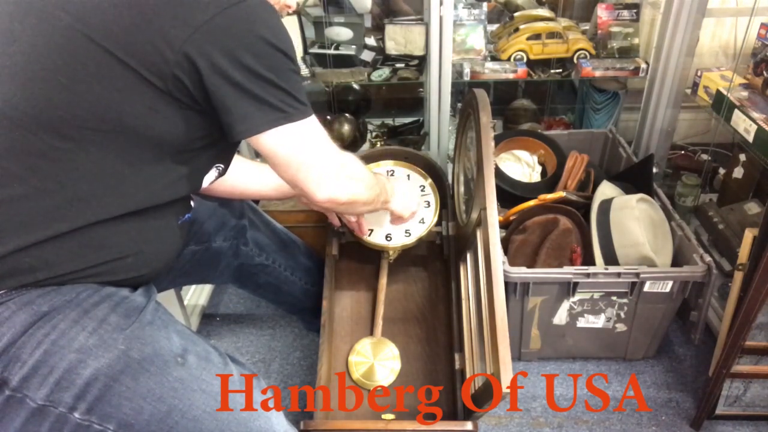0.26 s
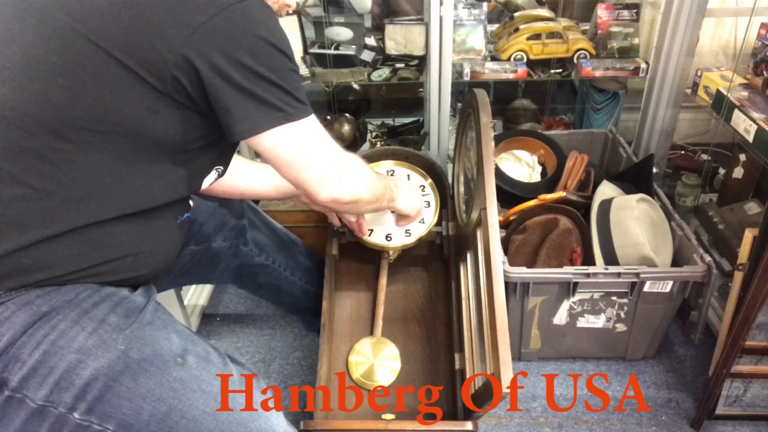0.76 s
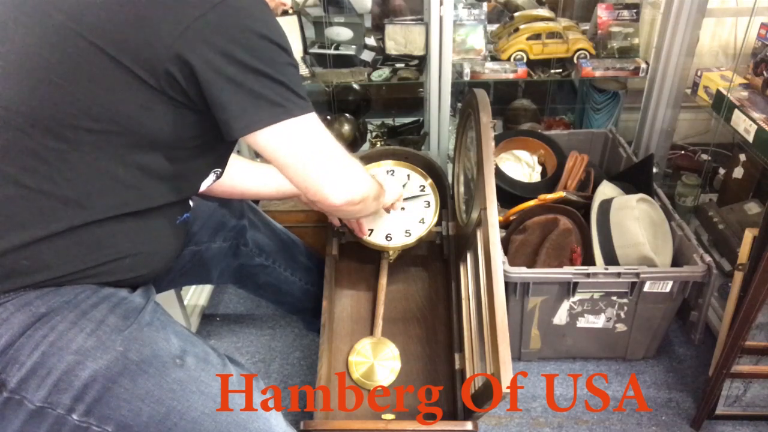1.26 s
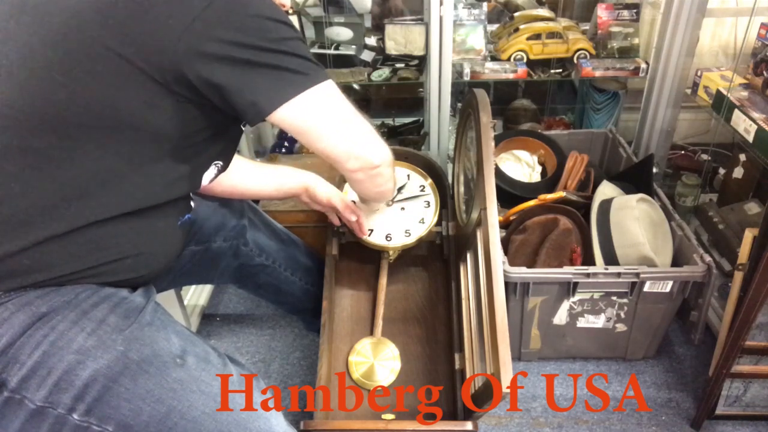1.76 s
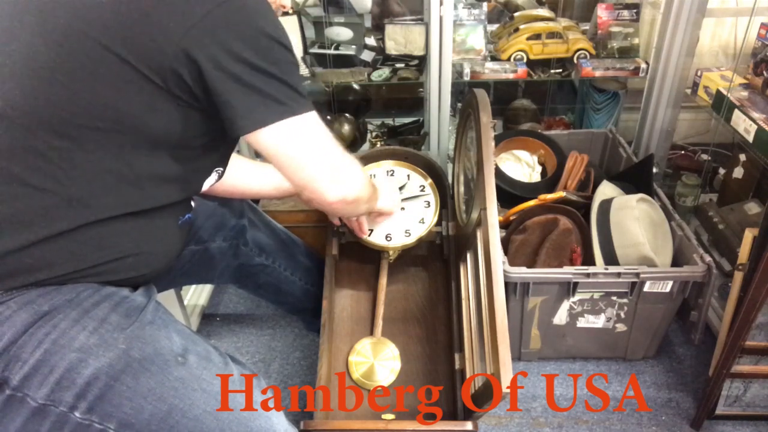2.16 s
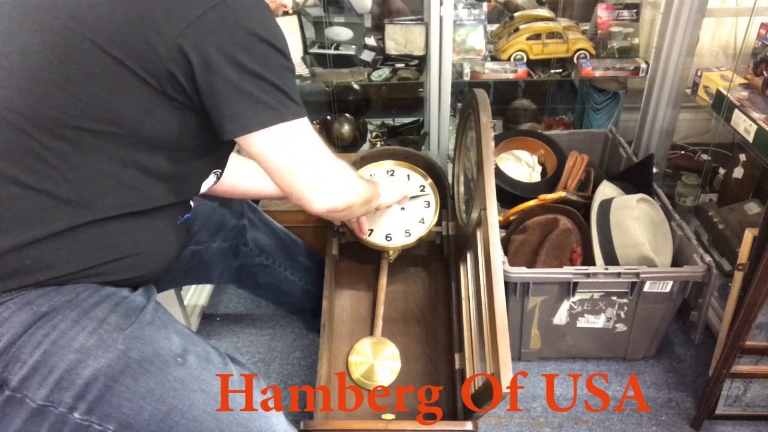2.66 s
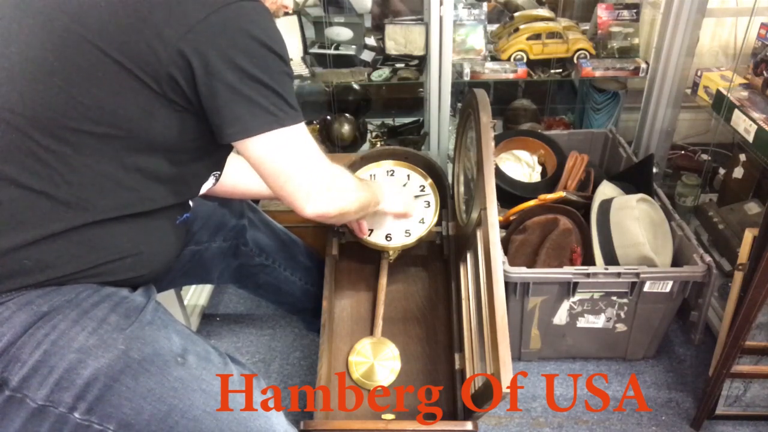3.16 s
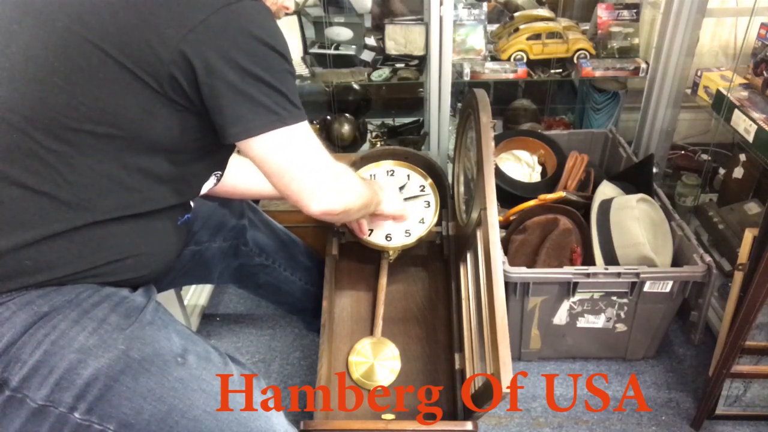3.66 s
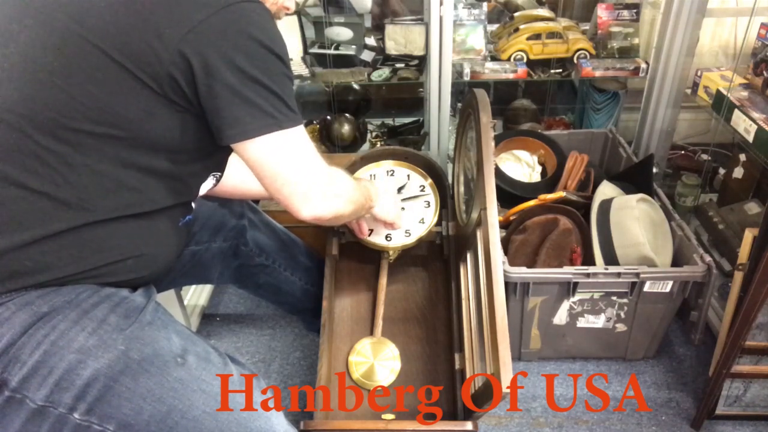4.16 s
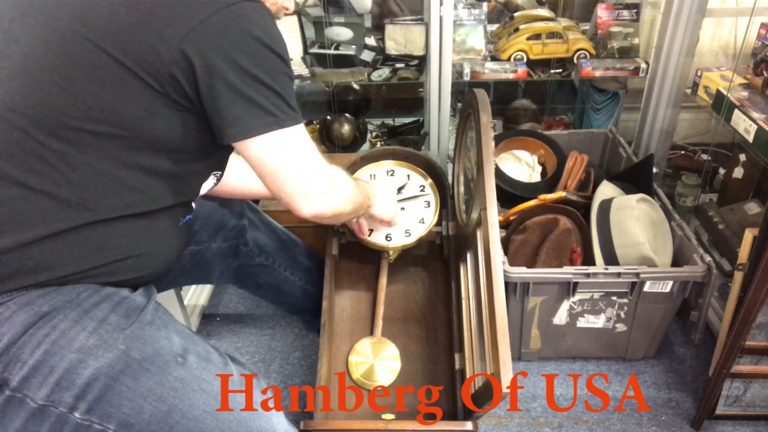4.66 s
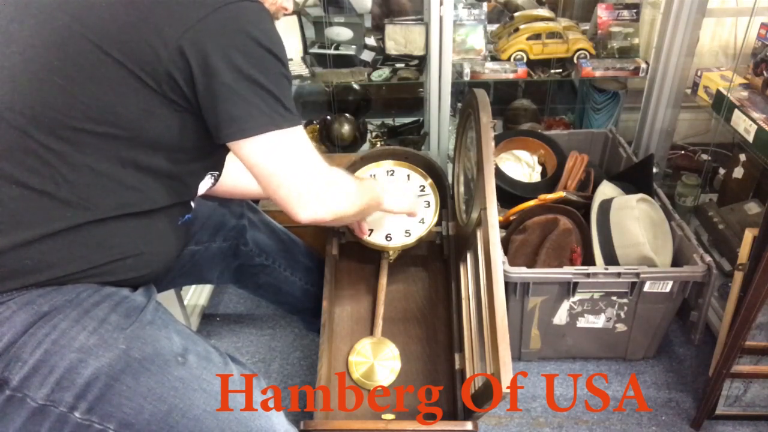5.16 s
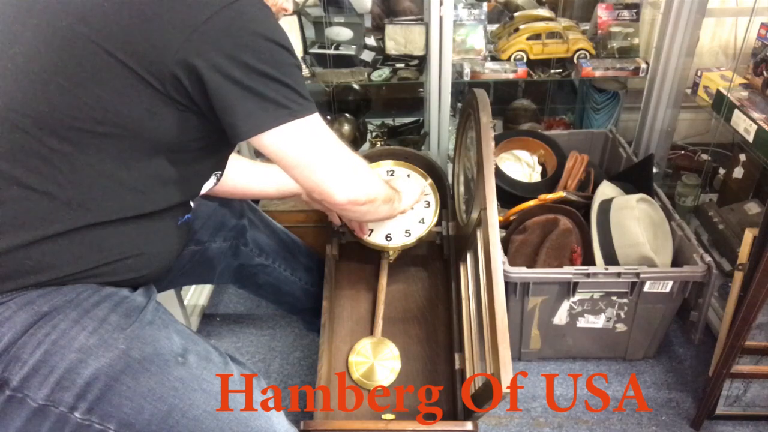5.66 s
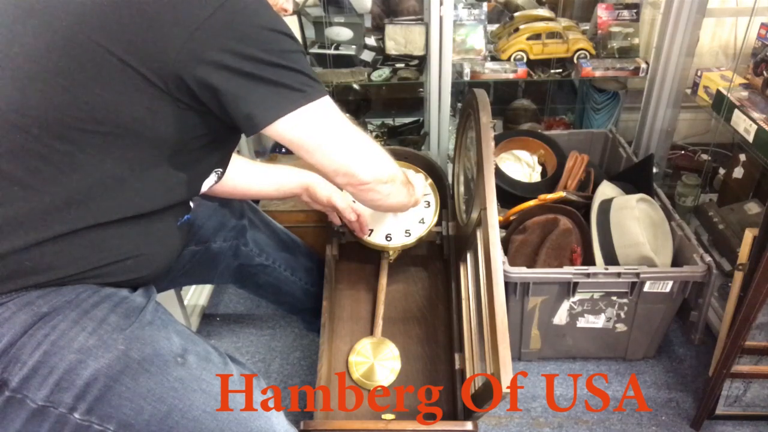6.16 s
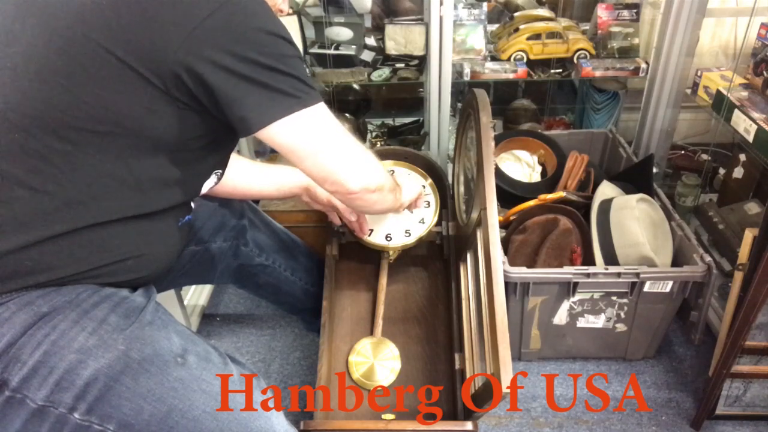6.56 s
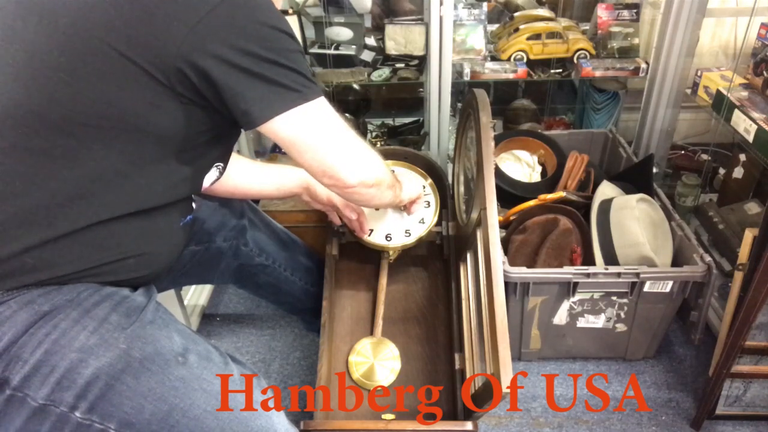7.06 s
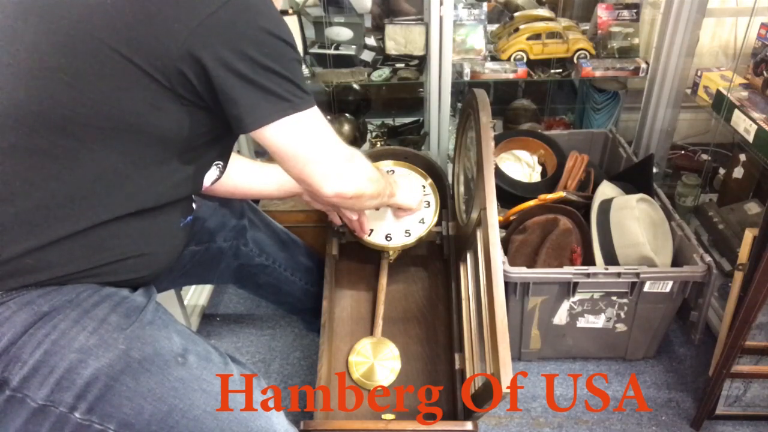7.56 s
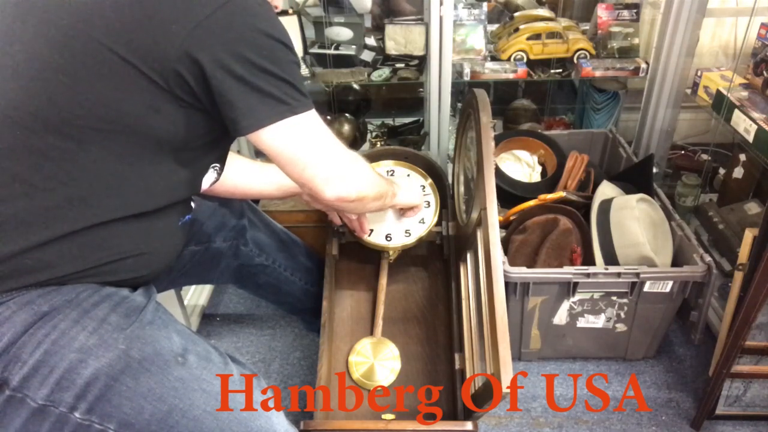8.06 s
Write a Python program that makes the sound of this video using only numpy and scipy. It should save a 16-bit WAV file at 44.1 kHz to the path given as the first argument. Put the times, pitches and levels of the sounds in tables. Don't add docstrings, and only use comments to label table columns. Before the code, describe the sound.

A pendulum wall clock is wound by key indoors, slow ringing ratchet clicks, then rapid dry click bursts, soft wooden thuds and faint metallic clinks.

```python
import sys
import numpy as np
from scipy import signal
from scipy.fft import rfft, irfft, next_fast_len
from scipy.io import wavfile
from scipy.ndimage import uniform_filter1d, map_coordinates

SR = 44100
rng = np.random.default_rng(int(sys.argv[2]) if len(sys.argv) > 2 else 0)


def transcribe(u):
    v = np.clip(np.atleast_2d(u).T, -1, 1)
    q = np.round(v * 32767).astype(np.int16)
    wavfile.write(sys.argv[1], SR, q)


def elevation(decibels):
    levels = np.asarray(decibels, float)
    return 10 ** (levels / 20)


N = 366471
SPAN = 2 ** 15
HZ = np.fft.rfftfreq(SPAN, 1 / SR)

# (time [s], level [dB])
DRONE_LEVEL = [(0, -65.5), (.21, -45.5), (.42, -58), (1.6, -58.5), (2.0, -45), (2.27, -56), (2.55, -51.5),
               (2.94, -70), (3.15, -54), (3.9, -64), (4.62, -47), (5.3, -55), (5.97, -56.5), (6.15, -45),
               (7.05, -50), (7.34, -66), (7.55, -48.5), (8.31, -55.5)]
# (frequency [Hz], width [Hz], level [dB])
COOLER_MODES = [(71.67, 4.6, 0), (136.9, 7.8, -7.5), (225.3, 8.6, -9.5), (280, 23, -18.5),
                (404.3, 26.6, -20.5)]
# (frequency [Hz], level [dB])
HUSH_COLOUR = [(35, -22), (60, -3), (81, -8), (102, -46), (145, -14), (163, -13.5), (221, -16.5),
               (247, -14.5), (359, -21.5), (461, -18), (900, -29.5), (1170, -73), (1980, -120)]
HISS_COLOUR = [(410, -10.5), (700, -9), (885, -6), (1120, -3.5), (1230, -5.5), (2070, -13), (2750, -14),
               (3350, -18), (6340, -21), (10000, -28), (13700, -25.5), (15800, -36)]
# (frequency [Hz], rms level [dB])
MAINS_LINE = (100, -61.5)
# (time [s], peak [dB], case share [dB], tooth tone [Hz])
SLOW_DROPS = [
    (0.0949, -25, -18, 2040),
    (0.25, -23.5, -17.5, 1760),
    (0.463, -23.5, -20, 1920),
    (7.3152, -24, -16, 1640),
    (7.577, -23, -18.5, 3670),
]
QUICK_DROPS = [(1.963, -24, -19, 3500), (2.028, -24, -22, 3040), (2.0791, -24, -28, 5100),
               (2.1451, -25.5, -22.5, 4320), (2.2095, -27, -17.5, 4690), (2.2565, -25, -24, 2900),
               (2.3055, -26.5, -20.5, 3520), (2.3986, -24.5, -19.5, 2780), (2.7699, -24.5, -17, 4500),
               (2.808, -22.5, -24.5, 4690), (2.849, -22.5, -19, 3080), (2.8846, -23, -19, 3010),
               (2.9102, -26, -16, 3120), (2.9517, -26, -22, 2600), (2.9941, -26.5, -18.5, 5260),
               (3.4568, -24, -19.5, 4300), (3.5646, -22, -18.5, 4690), (3.5929, -24.5, -12, 2770),
               (3.6225, -23.5, -19, 4620), (3.6721, -23.5, -19, 4400), (3.717, -22.5, -21.5, 4600),
               (3.7564, -24.5, -23, 3310), (3.8134, -25.5, -21.5, 4690)]
# (frequency [Hz], level [dB])
SLOW_SNAP_COLOUR = [(180, -23.5), (300, -16.5), (1970, -6.5), (2790, -16), (3890, -3), (4590, -8.5),
                    (5080, -1.5), (5700, -9), (8360, -11.5), (9090, -5.5), (10700, -16.5), (14000, -7),
                    (16000, -15.5)]
QUICK_SNAP_COLOUR = [(180, -36.5), (300, -2.5), (343, -9.5), (511, -6.5), (634, -6.5), (946, -1.5),
                     (1280, -8), (3080, -0.5), (3950, -4.5), (4590, 0.5), (10400, -13.5), (12900, -6.5),
                     (16000, -11.5)]
# (frequency [Hz], width [Hz], level [dB])
SLOW_PLATE_MODES = [(523, 46, 4), (706, 64, -5.5), (1000, 16, 2.5), (1640, 41, -8), (3780, 200, -15),
                    (7200, 70, 2.5), (9650, 18, 6), (12300, 130, -7)]
QUICK_PLATE_MODES = [(521.3, 14.7, 10), (1001, 22, 11.5), (1700, 16, 9.5), (2780, 14, 6), (2976, 140, -9),
                     (3610, 45, 3), (3580, 26, 6), (4690, 43, -3), (5300, 49, -19), (5060, 400, -0.5),
                     (7260, 610, -4.5), (7500, 300, 5.5), (12830, 110, -17)]
PAWL_SPRING_MODES = [(5030, 16, 10), (5100, 14, 12), (5165, 50, 10), (5225, 18, 10)]
# (time [s], peak [dB], top share [dB], tone [Hz], contact t60 [s])
CASE_THUDS = [(0.098, -33, 0, 284, 0.12), (0.161, -36.5, -9, 273, .13), (0.299, -59, -2, 283, .1),
              (0.355, -33.5, -25, 260, 0.16), (0.605, -31, -12, 300, 0.16), (0.831, -34, -25, 252, 0.13),
              (1.658, -35.5, -13, 511, 0.096), (1.828, -32, -11.5, 280, 0.074),
              (1.858, -37.5, -28, 282, 0.14), (4.795, -45, -26, 433, 0.11), (5.019, -42, 0.5, 280, 0.078),
              (6.389, -38.5, -19, 240, 0.066), (6.74, -54.5, -8, 221, .08), (7.843, -30, -14, 520, .05)]
# (time [s], peak [dB], top share [dB], tone [Hz], contact t60 [s])
ARBOR_CLINKS = [(0.3505, -41.5, -23, 1850, 0.036), (0.395, -49, -12, 1280, .055),
                (0.942, -39, -18, 1330, 0.19), (0.9721, -46, -11, 1700, 0.042),
                (4.007, -54, -11, 1510, 0.078), (4.827, -53.5, -19, 1010, 0.072),
                (5.012, -38.5, -15, 1090, 0.054), (5.0589, -60, -24, 1000, 0.077),
                (5.5445, -44.5, -8.5, 1700, 0.065), (5.5793, -39.5, -15, 1430, 0.056),
                (5.709, -46.5, -32, 1810, .04), (5.877, -55, 0, 1940, 0.16), (6.3223, -59, -11, 1350, .07),
                (6.371, -47, -27, 1950, 0.11), (8.0308, -49, -11, 1480, .045),
                (8.1876, -42.5, -21, 1700, 0.15), (8.231, -44.5, -14.5, 1700, 0.054)]
# (time [s], peak [dB], top share [dB], tone [Hz])
DIAL_TAPS = [(0.6, -40, -11, 1700), (0.7983, -37, -14, 1660), (1.3292, -41, -15, 1410),
             (1.3675, -41.5, -19.5, 1000), (1.3939, -44.5, -23, 2130), (1.6535, -38.5, -34.5, 1050),
             (1.782, -37, -31, 1500), (1.8272, -36, -17, 1000), (2.714, -45, -21.5, 3000),
             (6.6964, -51, -38, 1880), (7.8409, -33, -19.5, 1190), (8.1184, -41.5, -12.5, 970)]
# (frequency [Hz], level [dB])
THUD_COLOUR = [(90, -34.5), (160, -5.5), (270, -4), (520, -4), (900, -15), (1700, -18.5), (4000, -33),
               (16000, -67)]
TAP_COLOUR = [(240, -33.5), (500, 2.5), (900, -6), (1700, -4.5), (2600, -11), (4400, -16), (6200, -23),
              (16000, -43)]
# (frequency [Hz], width [Hz], level [dB])
CASE_MODES = [(247, 37, -3.5), (511, 47, 6.5), (1014, 12, -14), (1410, 64, -11.5), (1700, 8, -24),
              (1850, 640, -15.5), (2130, 28, -32), (2440, 63, -23)]
# (frequency [Hz], t60 [s])
ROOM_T60 = [(260, 0.76), (480, 0.31), (800, 0.3), (2000, 0.31), (5500, 0.26), (14000, 0.19)]
# (frequency [Hz], level [dB])
WALL_RETURN = [(300, 1.5), (900, 2.5), (2500, -1.6), (14000, -1.5)]
# (frequency [Hz], width [Hz], depth share [dB])
PORT_NOTCH = (10580, 410, -5)

RUMBLE_DB, RUMBLE_PER_DRONE_DB, RUMBLE_LUMPS_DB = -72, 0.3, 5
STIR_DB, STIR_S = 1.2, 0.12
RATTLE_T60_S, RATTLE_GROWTH_PER_DB = 0.044, 0.038
TOP_LOSS_PER_DB = 0.74
THUD_TONE_DB, THUD_TONE_PER_DB = 8, 0.54
CLINK_TONE_DB, TAP_TONE_DB = 13.5, 4.5
TAP_T60_S, TAP_DRAG_S_PER_DB = 0.076, 0.0027
SOFT_TOP, SOFT_KNEE = 0.17, 3.9
BAND_LIMIT_HZ = 15950


def unit(x):
    return x / np.sqrt(np.mean(x ** 2) + 1e-20)


def along(points, hz):
    f, v = np.transpose(points)
    return np.interp(np.log(hz + 1), np.log(f + 1), v)


def wobble(rate_hz):
    knots = rng.standard_normal(int(N * rate_hz / SR) + 4)
    return map_coordinates(knots, [np.arange(N) * rate_hz / SR])


def resonances(modes, hz, scatter_db=0.):
    centre, width, db = np.transpose(modes)[..., None]
    sign = (-1.) ** np.arange(len(centre))[:, None]
    shapes = 1j * hz * width / (centre * centre - hz * hz + 1j * hz * width)
    return (sign * elevation(db))[:, 0] * elevation(scatter_db) @ shapes


def causal(gain):
    cepstrum = irfft(np.log(gain + 1e-6))
    half = cepstrum.shape[-1] // 2
    cepstrum[..., 1:half] *= 2
    cepstrum[..., half + 1:] = 0
    return np.exp(rfft(cepstrum))


def background():
    t = np.arange(N) / SR
    m = next_fast_len(N + SPAN)
    hz = np.fft.rfftfreq(m, 1 / SR)
    noise = rfft(rng.standard_normal((5, m)))

    drone_db = np.interp(t, *np.transpose(DRONE_LEVEL))
    lowest = irfft(noise[0] * resonances(COOLER_MODES[:1], hz) ** 2, m)[:N]
    swell = np.sqrt(np.abs(uniform_filter1d(lowest ** 2, size=SR // 8)))
    lowest /= swell + 0.2 * lowest.std()
    upper = unit(irfft(noise[1] * resonances(COOLER_MODES[1:], hz), m)[:N])

    hush = unit(irfft(noise[2] * elevation(along(HUSH_COLOUR, hz)), m)[:N])
    hiss = unit(irfft(noise[3] * elevation(along(HISS_COLOUR, hz)), m)[:N])
    steps_s = np.arange(0, N, SR // 100) / SR
    effort = sum(np.exp(-((steps_s - s) / STIR_S) ** 2) for s, *_ in SLOW_DROPS + QUICK_DROPS)
    stir_db = STIR_DB * np.interp(t, steps_s, effort)

    rumble_db = RUMBLE_DB + RUMBLE_PER_DRONE_DB * (drone_db - drone_db.mean())
    rumble_db += RUMBLE_LUMPS_DB * wobble(8.4)
    rumble = unit(irfft(noise[4] * resonances([(46, 16, 0)], hz), m)[:N])
    mains_hz, mains_db = MAINS_LINE
    mains = np.sqrt(2) * elevation(mains_db) * np.sin(2 * np.pi * mains_hz * t)

    cooler = elevation(drone_db + 0.5) * lowest + elevation(-57.5) * upper
    air = elevation(-60.5) * hush + elevation(-68 + stir_db) * hiss
    return cooler + elevation(rumble_db) * rumble + mains + air


def room_tails(count):
    length = SPAN // 2
    hz, t, z = signal.stft(rng.standard_normal((count, length)), SR, nperseg=256)
    z = z * elevation(-60 * t / along(ROOM_T60, hz)[:, None])
    tails = signal.istft(z, SR, nperseg=256)[1][:, :length]
    tails = tails * (1 - np.exp(-np.arange(length) / SR / 0.0038))
    return tails / np.linalg.norm(tails, axis=1, keepdims=True)


def strikes(s, peak_db, t60_s, colour, ring, smooth_bins, rattled, rise_s, spiky_db, lumpy_db, crack_db,
            room_db, ring_to_room):
    t = np.arange(SPAN // 4) / SR
    draw = rng.standard_normal((len(s), 2 * len(t)))
    impacts, sizes = draw[:, :len(t)], draw[:, len(t):]
    impacts = impacts * elevation(spiky_db * uniform_filter1d(sizes, size=9, axis=1))
    slips = unit(uniform_filter1d(sizes[:, ::-1], size=170, axis=1))
    impacts *= elevation(lumpy_db * slips)
    impacts *= 1 - np.exp(-(t / rise_s) ** 2)

    decay_db = -60 * t / np.clip(t60_s, 0.01, 0.3)[:, None]
    chatter = rfft(impacts * elevation(decay_db), SPAN)
    crack = rfft(impacts * elevation(2.5 * decay_db), SPAN) * 1j * HZ / (1j * HZ + 9000)
    chatter += elevation(crack_db) * crack
    power = uniform_filter1d(np.abs(chatter) ** 2, size=smooth_bins, axis=1)
    chatter *= causal(1 / np.sqrt(power))
    blow = np.exp(-2j * np.pi * HZ * 1.5 * rise_s)
    rung = (rattled * chatter + (1 - rattled) * blow) * ring

    room = rfft(room_tails(count=len(s)), SPAN)
    power = np.abs(room) ** 2
    even = uniform_filter1d(power, size=1500, axis=1) / uniform_filter1d(power, size=60, axis=1)
    room *= causal(np.sqrt(even))
    room *= elevation(room_db + along(WALL_RETURN, HZ))
    heard = irfft(colour * (chatter + rung + (chatter + ring_to_room * rung) * room))
    loudest = uniform_filter1d(heard ** 2, size=SR // 100, axis=1).max(axis=1)
    heard *= (elevation(peak_db) / np.sqrt(loudest))[:, None]

    out = np.zeros(N + SPAN)
    for start_s, sound in zip(s, heard):
        out[round((start_s - 0.0015) * SR):][:SPAN] += sound
    return out[:N]


def tilt(bands_hz, *shares_db):
    rows = np.transpose([db - np.median(db) for db in shares_db])
    return np.array([along(list(zip(bands_hz, row)), HZ) for row in rows])


def ringing(modes, colour, count, ring_db):
    above = [(hz, width, db + ring_db - along(colour, hz)) for hz, width, db in modes]
    return resonances(above, HZ, 1.5 * rng.standard_normal((count, len(modes))))


def pawl(events, colour, plate, ring_db, tooth_width_hz, tooth_db, lag_s, **contact):
    s, peak_db, case_db, tooth_hz = np.transpose(events)
    top_db = -TOP_LOSS_PER_DB * peak_db
    t60_s = RATTLE_T60_S * (1 + RATTLE_GROWTH_PER_DB * (case_db - case_db.mean()))
    colour_db = along(colour, HZ) + tilt((600, 3200, 11000), case_db, 0 * s, top_db)
    colour_db += tooth_db * np.exp(-((HZ - tooth_hz[:, None]) / tooth_width_hz) ** 2)
    late_lows = np.exp(-2j * np.pi * lag_s * 1100 * np.arctan(HZ / 1100))
    ring = ringing(plate, colour, count=len(s), ring_db=ring_db)
    return strikes(s, peak_db, t60_s, causal(elevation(colour_db)) * late_lows, ring, smooth_bins=450, **contact)


def pawls():
    slow = pawl(SLOW_DROPS, SLOW_SNAP_COLOUR, sorted(SLOW_PLATE_MODES + PAWL_SPRING_MODES),
                ring_db=-3.0, tooth_width_hz=98, tooth_db=5.5, lag_s=0.00413, rattled=0.14, rise_s=0.0012,
                spiky_db=7.5, lumpy_db=1.3, crack_db=5.5, room_db=-8, ring_to_room=0.85)
    quick = pawl(QUICK_DROPS, QUICK_SNAP_COLOUR, QUICK_PLATE_MODES,
                 ring_db=-2.5, tooth_width_hz=170, tooth_db=5.5, lag_s=0.005, rattled=0.62, rise_s=0.0014,
                 spiky_db=1.5, lumpy_db=2.24, crack_db=5.5, room_db=-7, ring_to_room=0.67)
    return elevation(-2.0) * (slow + quick)


def touch(events, colour, bands_hz, tone_width_hz, ring_db, **contact):
    s, peak_db, top_db, tone_hz, tone_db, t60_s = np.transpose(events)
    tones = np.array([resonances([(hz, tone_width_hz, db)], HZ) for hz, db in zip(tone_hz, tone_db)])
    ring = tones + ringing(CASE_MODES, THUD_COLOUR, count=len(s), ring_db=ring_db)
    colour_db = along(colour, HZ) + tilt(bands_hz, 0 * s, top_db)
    return strikes(s, peak_db, t60_s, causal(elevation(colour_db)), ring, **contact)


def key():
    mean_db = np.mean(CASE_THUDS, axis=0)[1]
    mean_top_db = np.mean(DIAL_TAPS, axis=0)[2]
    wood = [(*row, THUD_TONE_DB + THUD_TONE_PER_DB * (row[1] - mean_db), t60_s) for *row, t60_s in CASE_THUDS]
    metal = [(*row, CLINK_TONE_DB, t60_s) for *row, t60_s in ARBOR_CLINKS]
    for row in DIAL_TAPS:
        metal.append((*row, TAP_TONE_DB, TAP_T60_S + TAP_DRAG_S_PER_DB * (mean_top_db - row[2])))
    thuds = touch(wood, THUD_COLOUR, (500, 2500), tone_width_hz=42, ring_db=-1.5, smooth_bins=90,
                  rattled=0.6, rise_s=0.005, spiky_db=3.2, lumpy_db=1.6, crack_db=-6,
                  room_db=-8.5, ring_to_room=0.81)
    taps = touch(sorted(metal), TAP_COLOUR, (1800, 6000), tone_width_hz=133, ring_db=-19.0, smooth_bins=200,
                 rattled=0.64, rise_s=0.00217, spiky_db=5.0, lumpy_db=4.0, crack_db=-9,
                 room_db=-6, ring_to_room=0.36)
    return elevation(-4.5) * (thuds + taps)


def scene():
    return (background() + pawls() + key())[None]


def top_cut(x):
    return signal.sosfilt(signal.butter(12, 16970, fs=SR, output="sos"), x)


def record(dry):
    dry = dry / (1 + np.abs(dry / SOFT_TOP) ** SOFT_KNEE) ** (1 / SOFT_KNEE)
    m = 2 * next_fast_len(N // 2 + SPAN)
    hz = np.fft.rfftfreq(m, 1 / SR)
    limit = causal(elevation(-48 * np.clip((hz - BAND_LIMIT_HZ) / 250, 0, 1)))
    port = 1 - resonances([PORT_NOTCH], hz)
    mix = irfft(rfft(dry, m) * limit * port, m)[:, :N]
    return top_cut(mix)


dry = scene()
out = record(dry)
transcribe(out)
```